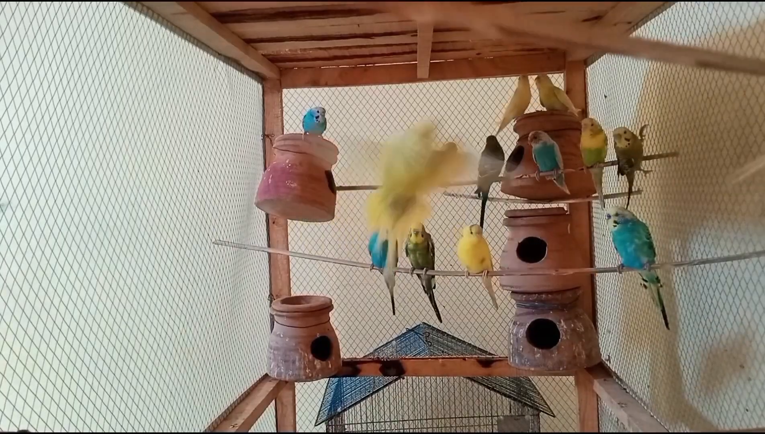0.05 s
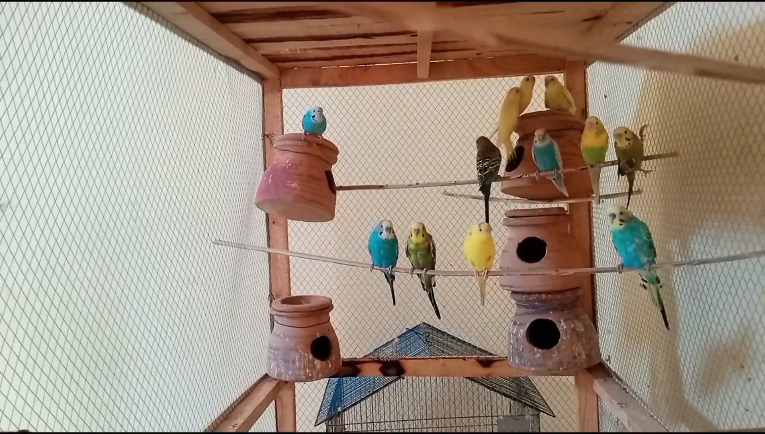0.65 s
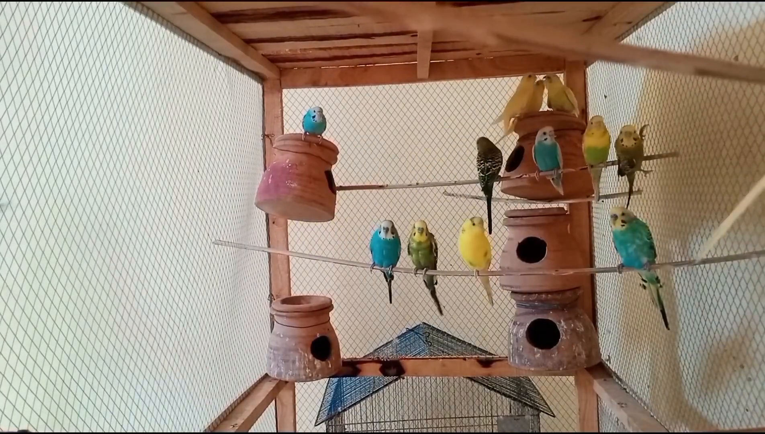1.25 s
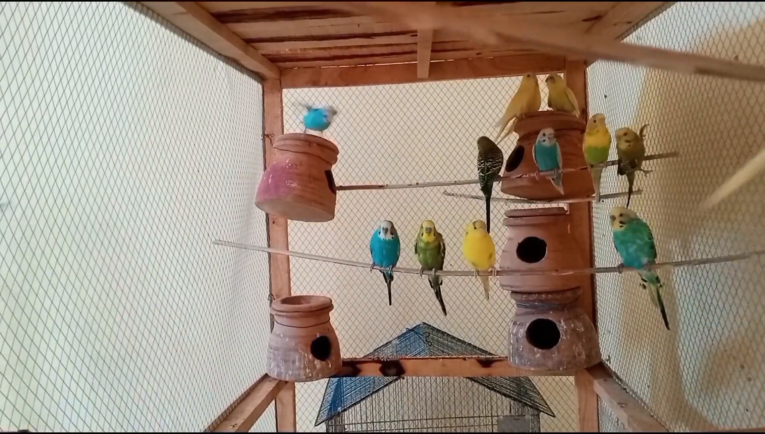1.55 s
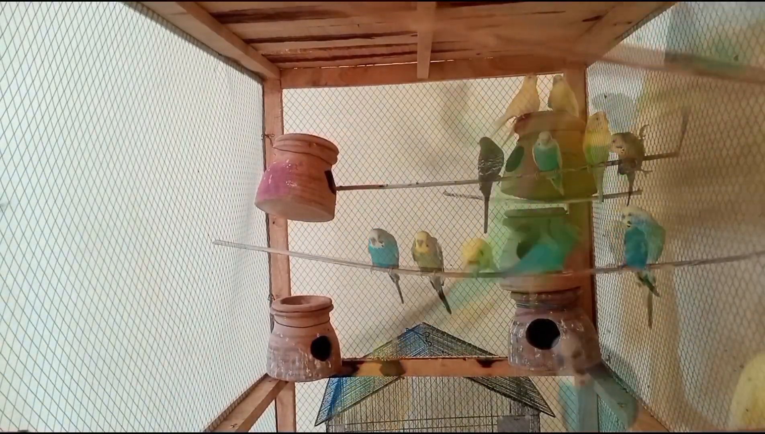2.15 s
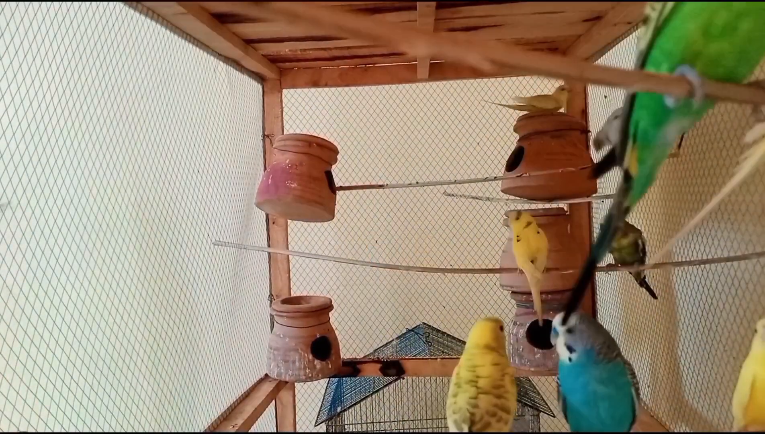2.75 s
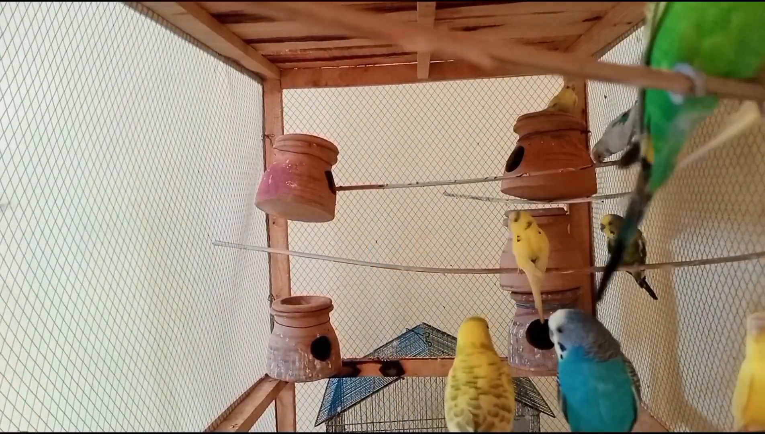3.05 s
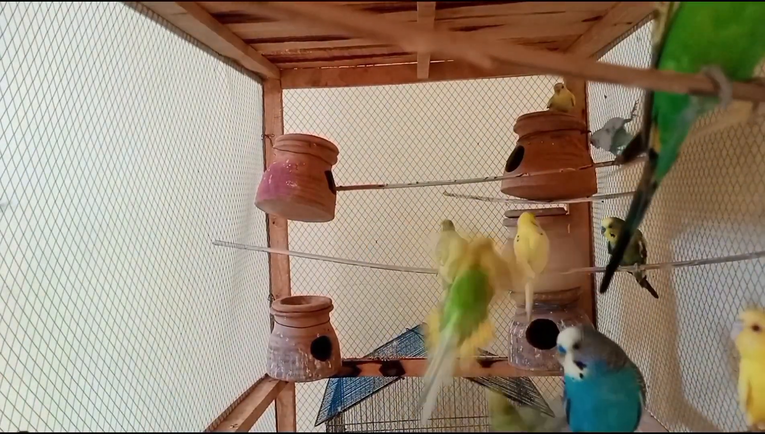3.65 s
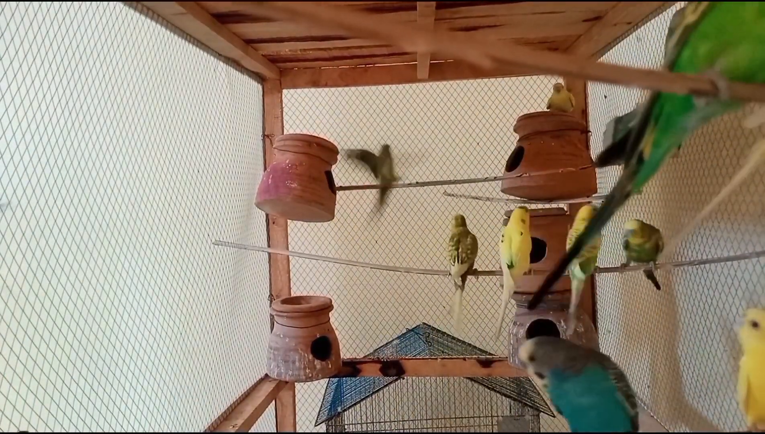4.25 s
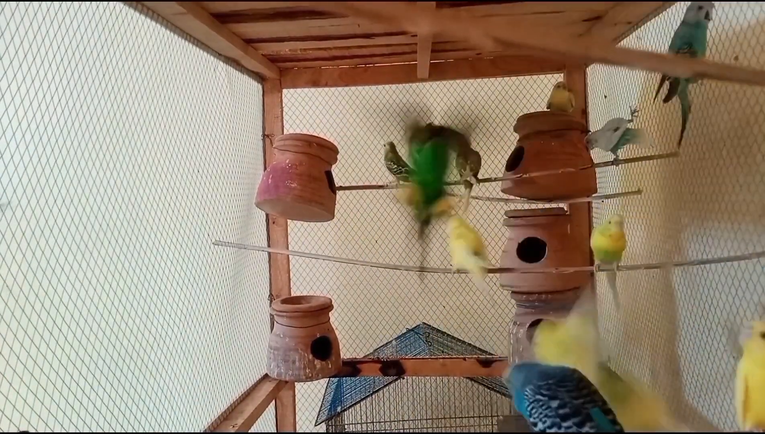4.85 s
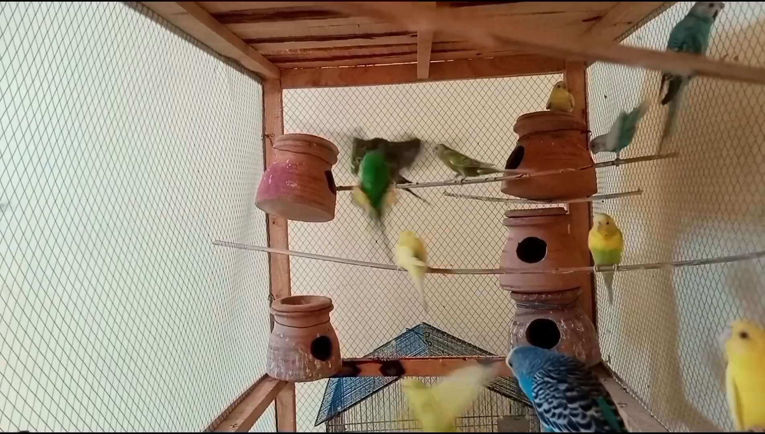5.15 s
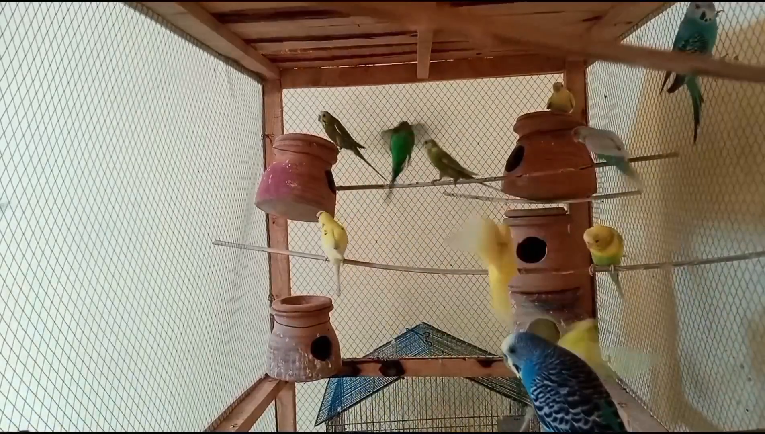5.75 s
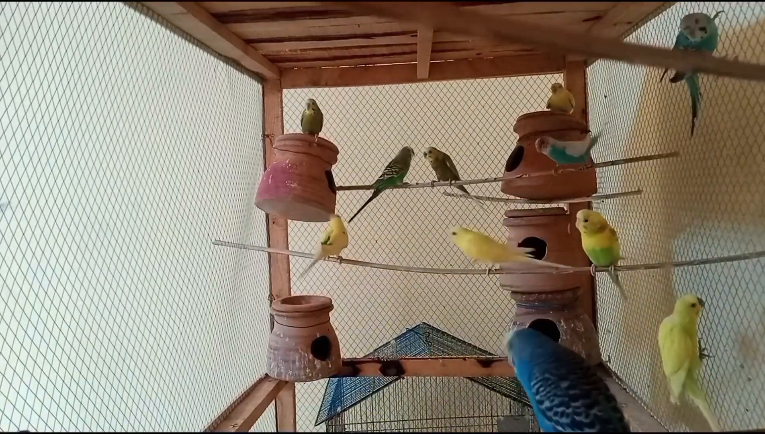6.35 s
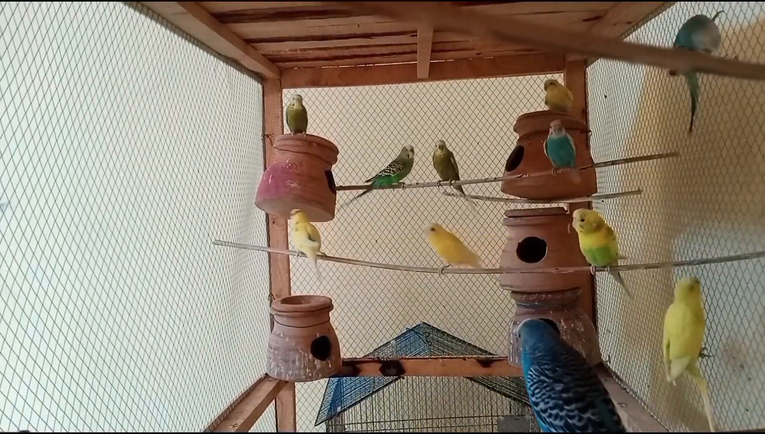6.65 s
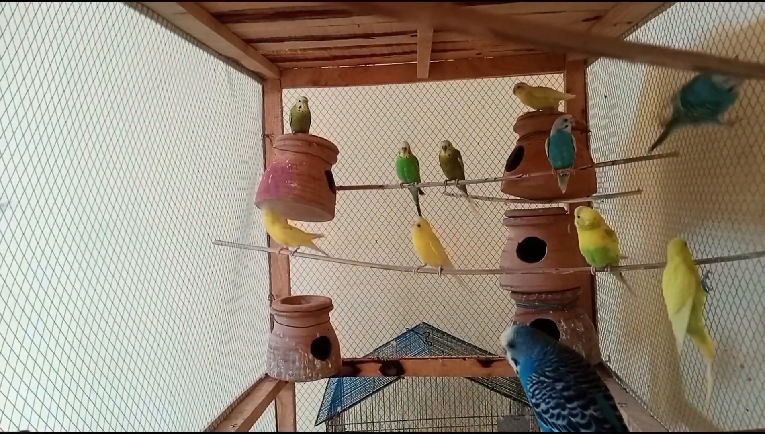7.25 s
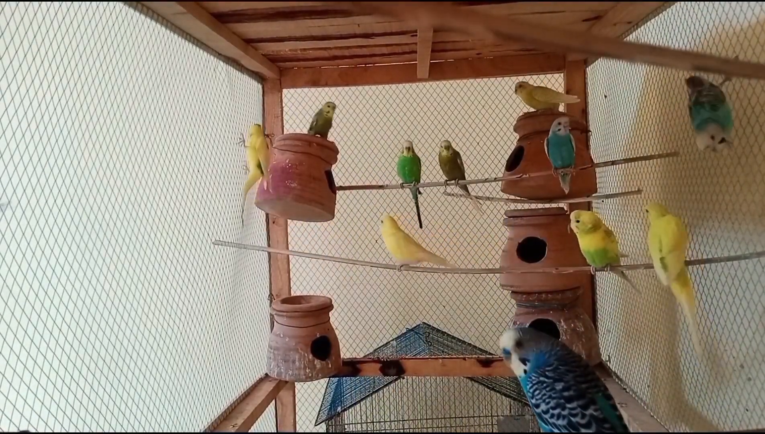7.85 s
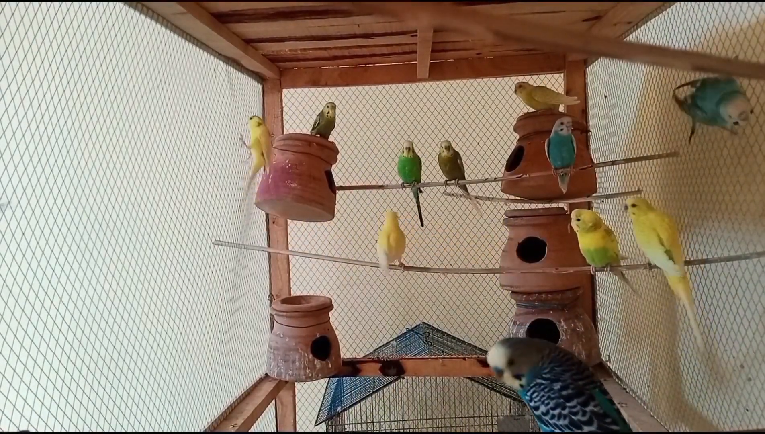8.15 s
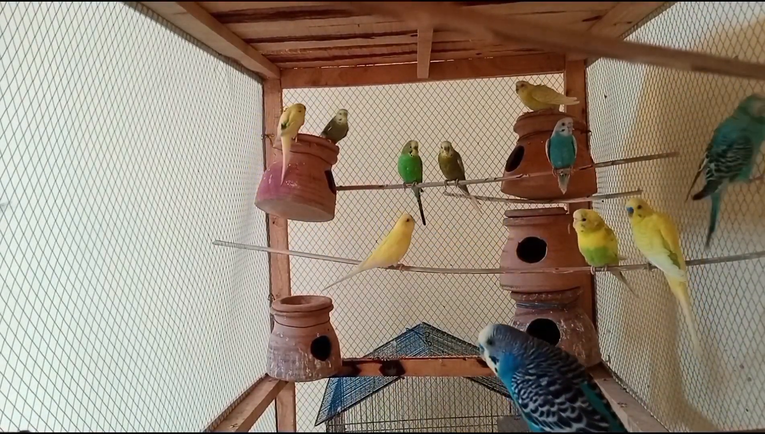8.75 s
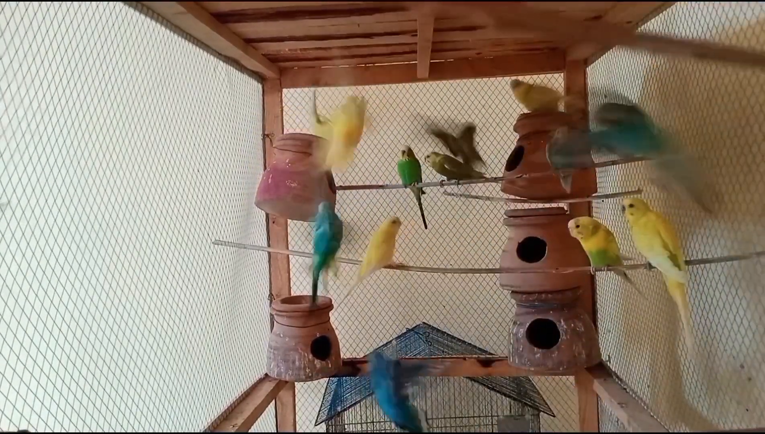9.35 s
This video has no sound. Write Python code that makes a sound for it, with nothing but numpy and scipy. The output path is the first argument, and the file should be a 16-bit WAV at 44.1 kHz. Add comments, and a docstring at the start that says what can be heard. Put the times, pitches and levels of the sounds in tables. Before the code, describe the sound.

Small parrots flutter close by in a wire aviary, with bursts of wingbeats, knocks on perches, brief high chirps and one squawk.

```python
"""A soft rush of wings and a quiet warble: budgerigars in a small wire aviary, in a bare, echoing corner. Then
they fly close by. Their wings push air, thrum and whoosh, feathers swish and snap, claws rattle the mesh, and
wings and feet knock sharply. Between flights the membranes of the syrinx give sharp chirps, one nasal call and
one falling squawk. Near walls echo it all, over a faint outdoor wash."""
import sys
import numpy as np
from scipy import signal
from scipy.fft import rfft, irfft, next_fast_len
from scipy.io import wavfile
from scipy.ndimage import uniform_filter1d

SR = 44100
rng = np.random.default_rng(int(sys.argv[2]) if len(sys.argv) > 2 else 0)


def log_audio(samples):
    """Write samples as a 16-bit WAV file to the path given in sys.argv[1]."""
    # one column per channel
    frames = np.atleast_2d(samples).T
    # limit to full scale, then quantise
    limited = np.clip(frames, -1, 1)
    pcm = np.round(limited * 32767).astype(np.int16)
    wavfile.write(sys.argv[1], SR, pcm)


N = 418950
TOP_HZ = 15750  # upper band edge


# Birds flying past. Each row: closest moment in seconds, push, thrum and whoosh levels in dB,
# approach and departure in seconds. Levels in all cue tables are before the mix gains in scene().
FLYBYS = [(0.03, -56.5, -69, -62.5, 0.54, 0.79), (2.28, -43.5, -53.5, -51, 0.43, 0.226),
          (2.438, -80, -62, -47, 0.11, 0.44), (3.812, -45, -45, -45, 0.25, 0.23),
          (4.03, -77, -56, -61, 0.032, 0.34), (4.18, -64, -76, -52.5, 0.073, 0.22),
          (4.89, -45, -42.5, -45, 0.31, 0.49), (5.18, -40, -42, -39, 0.43, 0.41),
          (5.52, -51, -47.5, -53, 0.61, 0.25), (5.849, -60.5, -61, -59, 0.69, 0.26),
          (9.072, -54, -53, -45, 0.052, 0.63), (9.4, -48, -48.5, -49.5, 0.34, 1)]

def flyby_swell(layer, far_db, roundness=1.44):
    """Each bird swells as it nears and fades as it leaves, passing far_db at both ends of its flight."""
    t, power = np.arange(N) / SR, np.zeros(N)
    for closest, push_db, thrum_db, whoosh_db, approach, departure in FLYBYS:
        db = {"push": push_db, "thrum": thrum_db, "whoosh": whoosh_db}[layer]
        away = np.maximum((closest - t) / approach, (t - closest) / departure)
        power += amp(db + far_db * np.minimum(away, 5) ** roundness) ** 2
    return np.sqrt(power)


# Single flaps whose draught reaches the listener. Each row: middle in seconds, level in dB.
LONE_FLAPS = [(0.532, -62.5), (1.108, -56), (3.42, -53), (4.669, -48.5)]

def flap_swell(width_s=0.044):
    """A lone flap gives one soft swell of air."""
    t = np.arange(N) / SR
    return sum(amp(db) * np.exp(-((t - s) / width_s) ** 2) for s, db in LONE_FLAPS)


# Three layers of moving air: deep push, low thrum, broad whoosh. Each row: frequency in Hz, gain in dB.
PUSH_EQ = [(18, -51.5), (32, -30.5), (50, -9), (72, 7), (100, -13.5), (125, -12), (170, -50), (400, -73.5)]
THRUM_EQ = [(60, -26), (105, -0.5), (130, -1), (180, -0.5), (235, 0.5), (285, -4), (350, -19), (1200, -73)]
WHOOSH_EQ = [(150, -25.5), (340, -4.5), (460, 0), (700, 0), (1300, -1.5), (2200, -11.5), (3000, -14.5),
             (6200, -17.5), (8000, -29), (10000, -30), (13000, -51), (15200, -24.5)]

def wing_air(swell, eq, beat_depth, patch_db, patch_hz, beat_hz=19):
    """Air stirred by the wings, throbbing with their uneven beat."""
    beats = np.sin(phase_of(beat_hz * (1 + 0.191 * wander(N, 7.1))))
    air = resonances(colour(rng.standard_normal(N), eq), patch_db, patch_hz, hold_s=.05)
    air /= np.sqrt(abs(uniform_filter1d(air ** 2, size=4000)) + 1e-12)  # only the birds set the swell
    return unit(air * (1 + beat_depth * beats)) * swell


# The strongest, closest downstrokes. Each row: middle in seconds, level in dB, pitch in Hz.
DOWNSTROKES = [(2.263, -35, 108), (2.311, -38, 128.9), (2.42, -42.5, 259.2), (3.733, -36, 218),
               (3.808, -43, 199), (4.873, -28, 106), (4.917, -27, 130), (4.977, -29.5, 126),
               (5.154, -24, 156), (5.238, -24, 150), (5.338, -27.5, 176), (9.310, -32, 214),
               (9.413, -33, 168), (9.465, -26, 121)]
# The tone of a wing slapping the air. Each row: frequency in Hz, gain in dB.
SLAP_EQ = [(150, 2), (420, -4.5), (800, 9.5), (2200, -32), (9000, -37)]

def wing_thumps(length_s=0.03983, sag_octaves=0.65, slap_db=-7, slap_s=.022):
    """A downstroke slaps the air and shoves a slug of it away: a low thump that sags in pitch."""
    out, n = np.zeros(N), int(slap_s * SR)
    sweep = np.linspace(-.5, .5, int(length_s * SR))
    for s, db, hz in DOWNSTROKES:
        phase = phase_of(hz * 2 ** (-sag_octaves * sweep)) + 2 * np.pi * rng.random()
        add(out, s - length_s / 2, amp(db) * np.sin(phase) * stroke(len(sweep), skew=0.73))
        slap = colour(rng.standard_normal(n), SLAP_EQ) * stroke(n, skew=0.21)
        add(out, s - slap_s / 2, amp(db + slap_db) * slap)
    return out


# Wings whirring as a bird brakes or hovers.
# Each row: start in seconds, length in seconds, pitch in Hz, level in dB.
WHIRRS = [(5.1, 0.45, 205, -45.5), (5.53, 0.17, 126, -42), (5, 0.7, 210, -60)]

def wing_hums(waver=0.031, flutter_db=3):
    """Fast wings set the air humming; the note wavers and flutters."""
    out = np.zeros(N)
    for s, length, hz, db in WHIRRS:
        n = int(length * SR)
        note = np.sin(phase_of(hz * (1 + waver * wander(n, 19.6))))
        add(out, s, amp(db + flutter_db * wander(n, 38)) * note * signal.windows.tukey(n, .5))
    return out


# Quick flicks of wing or tail.
# Each row: start in seconds, level in dB, length in seconds, low rustle in dB, top fizz in dB.
FEATHER_FLICKS = [(1.98, -50.5, 0.1, 11, 3), (2.309, -52.5, 0.0157, 2, 3), (2.367, -45.5, 0.11, 1, 9),
                  (2.403, -38, 0.044, 6, -6), (2.624, -53, 0.019, 20, 8), (2.723, -44.5, 0.033, 6.5, -1),
                  (2.845, -40.5, 0.073, -1, 7.5), (3.547, -51, 0.045, -2.5, 1),
                  (3.769, -41.5, 0.05, -42, -6), (4.828, -47.5, 0.032, -1, 2), (5.097, -43, 0.1, 5, -3),
                  (5.483, -48, 0.0594, -44, 7.5), (5.955, -58, 0.043, -2, -1), (5.994, -35, 0.085, -10, -2),
                  (6.435, -53, 0.018, -19.5, -5), (6.594, -55.5, 0.047, -5, -6.5),
                  (6.829, -59, 0.063, 5, 5.5), (7.062, -42, 0.034, -26.5, -9),
                  (7.136, -49.5, 0.13, -21, -8.5), (7.522, -36.5, 0.085, -16.5, 1.5),
                  (7.565, -42, 0.13, -2, -5), (7.748, -51.5, 0.055, -2, -0.5), (7.847, -45, 0.099, -27, 6),
                  (8.252, -59.5, 0.057, 18, 20), (8.517, -39, 0.068, -13, -17), (8.602, -39.5, 0.11, -7, 1),
                  (8.663, -43, 0.12, 1, -10.5), (9.004, -35, 0.11, 7, -4), (9.137, -51, 0.062, -16, -2),
                  (9.2, -49, 0.044, -2, 8)]
# Longer spells of ruffling and clambering.
# Each row: start in seconds, length in seconds, level in dB, low rustle in dB, top fizz in dB.
RUFFLES = [(0, 0.059, -65.5, 19, -29), (0.315, 0.32, -70.5, 13.5, -6), (1.036, 0.08, -69, 17, 4),
           (2.539, 0.26, -49.5, 2.5, -8.5), (3.285, 0.16, -60.5, 1.5, -5), (3.581, 0.15, -55.5, 8, -2),
           (4.62, 0.074, -45, 8, -3.5), (5.017, 0.196, -54.5, 9, -12), (5.406, 0.12, -46, -4, -9),
           (6.938, 0.32, -52.5, 3.5, -12), (7.884, 0.13, -55.5, 7.5, -35), (8.167, 0.14, -51, 4, -25),
           (8.347, 0.0767, -60.5, 6, 3), (9.118, 0.14, -50.5, 1, -8), (9.43, 0.057, -54, 13, -14)]
# The bright tone of feathers rubbing. Each row: frequency in Hz, gain in dB.
FEATHER_EQ = [(300, -28.5), (800, -17.5), (1300, -20), (1700, -9.5), (2000, -15.5), (2450, -6),
              (2900, -10.5), (4300, -2.5), (6200, 3), (7200, -5.5), (8100, -12.5), (9200, -5.5),
              (12000, -17), (15200, -9.5)]

def feathers(grain_db=0.5):
    """Barbs slide over each other and the wire: a bright, grainy hiss under each flick and ruffle."""
    out = np.zeros(N)
    hiss = resonances(rng.standard_normal(N), depth_db=4.5, width_hz=260, hold_s=.07)
    barbs = hiss * amp(grain_db * wander(N, 700))
    moves = [(s, amp(db) * stroke(int(length * SR), skew=0.42), shelves)
             for s, db, length, *shelves in FEATHER_FLICKS]
    moves += [(s, amp(db) * ruffle(length), shelves) for s, length, db, *shelves in RUFFLES]
    for s, force, shelves in moves:
        slide = barbs.take(int(s * SR) + np.arange(len(force)), mode="wrap")
        slide /= np.std(colour(slide, FEATHER_EQ))
        add(out, s, colour(slide, FEATHER_EQ, *shelves) * force)
    return out


def ruffle(length, attack_s=0.0053, release_s=0.013, fade_db=-4, shuffle_db=3.5, shuffles_per_s=41.5):
    """The envelope of small uneven movements that start quickly and slacken."""
    t = np.arange(int(length * SR)) / SR
    edges = np.clip(np.minimum(t / attack_s, (length - t) / release_s), 0, 1)
    return edges * amp(fade_db * (t / length - 0.5) + shuffle_db * wander(len(t), shuffles_per_s))


def wing_snaps(swell, beat_hz=17, unevenness=0.5, snap_s=0.016, snap_db=-10.5, spread_db=3):
    """Flight feathers snap in an uneven wingbeat rhythm, as loud as the bird is near."""
    gaps, sizes = rng.standard_normal((400, 2)).T
    times = np.cumsum(np.exp(unevenness * gaps)) / beat_hz
    force = np.zeros(N)
    for s, size in zip(times, np.clip(sizes, -2, 2)):
        add(force, s, amp(snap_db + spread_db * size) * stroke(int(snap_s * SR), skew=.4))
    return colour(rng.standard_normal(N), FEATHER_EQ, low_db=7.5, high_db=3.5) * force * swell


def quills(swell, per_s=40, spread_db=5, tick_db=-19, rest_db=-72):
    """Stiff quills and claws tick at random, harder while birds are flying."""
    sizes = amp(spread_db * np.minimum(rng.exponential(1, N), 3))
    hits = sizes * (rng.random(N) < per_s / SR)
    tick = rng.standard_normal(200) * np.exp(-np.linspace(0, 5, 200))
    ticks = colour(signal.oaconvolve(hits, tick)[:N], FEATHER_EQ, high_db=-7.0)
    return amp(tick_db) * unit(ticks) * (swell + amp(rest_db))


# Dry knocks, from wings clapping in flight and feet landing. Each row: start in seconds, level in dB, low thud
# in dB, top snap in dB.
CRACKS = [(2.197, -23.5, 0.5, -8.5), (2.395, -16, -5, 0.5), (2.721, -25, -20, -9), (2.848, -23, -19, 6),
          (4.76, -19, 2.5, 0.5), (4.879, -17, 8, -0.5), (4.941, -24.5, 7, -3), (5.007, -18, -12, 0),
          (5.059, -20.5, -10, -1), (8.978, -34.5, -7, 5)]
# The body of a dry knock. Each row: frequency in Hz, gain in dB.
CRACK_EQ = [(80, -35.5), (250, 15), (700, -2.5), (1700, 1.5), (3000, -1.5), (5500, 2), (8000, -4),
            (10000, -7), (13000, -22.5), (15200, -5.5)]

def dry_cracks(attack_s=0.00074, decay_s=0.0044):
    """Wings clap or feet land: a dry crack that dies in milliseconds."""
    out, t = np.zeros(N), np.arange(2048) / SR
    envelope = np.exp(-t / decay_s) * (1 - np.exp(-t / attack_s))
    for s, db, thud_db, snap_db in CRACKS:
        crack = colour(rng.standard_normal(len(t)), CRACK_EQ, thud_db, snap_db, low_hz=990, high_hz=4870)
        add(out, s, amp(db) * crack * envelope)
    return out


# Claws on the mesh. Each row: start in seconds, length in seconds, level in dB, brightness in dB.
CLAW_GRIPS = [(2.672, 0.081, -52.5, -18), (6.004, 0.077, -53.5, -19), (6.942, 0.085, -53.5, -11),
              (7.058, 0.0148, -59, 5.5), (7.128, 0.013, -50.5, 4), (7.447, 0.03, -57.5, -3),
              (7.75, 0.11, -55.5, -4.5), (7.866, 0.047, -48, 11), (7.93, 0.047, -53, -3),
              (8.191, 0.14, -52, -2), (8.483, 0.07, -54.5, 6), (8.525, 0.02, -45.5, 9.5),
              (8.581, 0.012, -41.5, 26), (8.65, 0.094, -52.5, 0), (8.891, 0.11, -60.5, -2)]
# The ringing modes of the wire. Each row: frequency in Hz, level in dB, seconds to fade by 60 dB.
WIRE_MODES = [(860, -9.5, 0.05), (1378, -10, .035), (1655, -3, 0.07), (1830, -3, 0.025), (2330, -2, 0.04),
              (2510, -3, 0.045), (3700, 1, 0.012), (4400, 4, 0.012), (4950, 5, 0.012), (6250, 4, 0.03)]

def mesh_rattles(catches_per_s=220, grit_db=4.5, place_db=2, detune=0.038, bright_hz=3500):
    """Each claw catches and slips, ringing the wire a little differently at each place it grips."""
    out, t = np.zeros(N), np.arange(SR // 3) / SR
    hz, mode_db, t60 = np.transpose(WIRE_MODES)[:, :, None]
    for s, length, db, bright_db in CLAW_GRIPS:
        strength, tuning = rng.standard_normal((2, len(WIRE_MODES), 1))
        gain_db = mode_db + place_db * strength + bright_db * (hz > bright_hz)
        modes = np.sin(2 * np.pi * hz * (1 + detune * tuning) * t)
        ring = (amp(gain_db - 60 * t / t60) * modes).sum(0)
        n = int(length * SR)
        slips = rng.standard_normal(n) * amp(grit_db * wander(n, catches_per_s)) * stroke(n, skew=0.43)
        rattle = signal.fftconvolve(slips, ring)
        add(out, s, amp(db) * rattle / np.std(rattle[:n + 500]))
    return signal.sosfilt(signal.butter(2, 750, "highpass", fs=SR, output="sos"), out)


# The colour the beak gives to overtones. Each row: frequency in Hz, gain in dB.
BEAK_EQ = [(2800, 10.5), (4200, 1), (5600, 9), (7100, 7.5), (7900, -12), (8900, -1.5), (10500, -30),
           (12500, -42)]

def syrinx(hz, tone_db, overtone_db, rough, jitter=0.16, shimmer=0.1):
    """A whistling membrane; its overtones pass the beak, and roughness shakes pitch and strength."""
    phase = phase_of(hz * (1 + jitter * rough * wander(len(hz), 1100)))
    overtones = sum(amp(curve_at(BEAK_EQ, k * hz)) * (k * hz < TOP_HZ) * np.sin(k * phase)
                    for k in range(2, 8))
    voice = amp(tone_db) * np.sin(phase) + amp(overtone_db) * overtones
    return np.sqrt(2) * voice * (1 + shimmer * rough * wander(len(hz), 1800))


# The squawk's two falling sweeps, the nasal call and a quick upward chirp.
# Each row: time in seconds, pitch in Hz, level in dB.
SQUAWK_FIRST = [(6.240, 3810, -51.5), (6.246, 3740, -32), (6.257, 3704, -40.5), (6.261, 3180, -36),
                (6.270, 3490, -18.5), (6.276, 3508, -48), (6.280, 2836, -28), (6.289, 2033, -20.5),
                (6.297, 2140, -40), (6.307, 2470, -18), (6.314, 2433, -46), (6.321, 2380, -15.5),
                (6.327, 1950, -24.5), (6.334, 1800, -32)]
SQUAWK_SECOND = [(6.320, 4070, -32.5), (6.329, 3780, -26), (6.335, 3490, -19.5), (6.341, 2870, -15.5),
                 (6.346, 3025, -18), (6.358, 2490, -19), (6.368, 2360, -36)]
NASAL_CALL = [(3.370, 1246, -60), (3.381, 1740, -47.5), (3.392, 1451, -45.5), (3.425, 1440, -40),
              (3.452, 1350, -40), (3.47, 1302, -67)]
UPWARD_CHIRP = [(4.2595, 2330, -50), (4.261, 2528, -29), (4.264, 2793, -38), (4.269, 2880, -37),
                (4.279, 2720, -45)]

def call(contour, rough, overtone_db, brightening=0):
    """One note that follows its pitch and effort; with brightening, a harder push favours overtones."""
    s, hz, db = np.transpose(contour)
    t, out = np.arange(s[0], s[-1], 1 / SR), np.zeros(N)
    effort_db = np.interp(t, s, db)
    upper_db = effort_db + overtone_db + brightening * (effort_db - db.max())
    note = syrinx(np.interp(t, s, hz), effort_db, upper_db, rough)
    add(out, s[0], note * signal.windows.tukey(len(t), .05))
    return out


# Sharp pips and murmured notes, and at 3.742 s the tonal hit of a wing at takeoff. Each row: middle in seconds,
# length in seconds, pitch in Hz, glide in # octaves, fundamental in dB, overtones in dB, roughness from 0 to 1,
# echo send in dB.
PIPS = [(0.248, 0.19, 689, -0.13, -65, -106, 0.6, 1.5), (0.755, 0.029, 1800, 0.55, -57, -73.5, 0.56, 3.5),
        (0.752, 0.014, 5570, 0.053, -48.5, -85, 0.1, -5), (1.508, 0.028, 884, -0.46, -62.5, -85, 0.15, 1),
        (1.616, 0.02, 1365, 0.028, -58, -87.5, 0.23, -1), (1.683, 0.035, 873, 0.12, -67, -92, 0.2, 4.5),
        (1.9914, 0.013, 2833, -0.12, -18.5, -55, 0.2, -6.5),
        (1.996, 0.014, 2835, -0.91, -32.5, -58, 0.42, 12),
        (3.742, 0.011, 1167, -0.35, -36.5, -74.5, 0.42, -10),
        (4.15, 0.013, 2480, 0.65, -44, -46.5, 0.77, 9.5), (4.159, 0.0095, 3220, 0.2, -24.5, -34.5, 0.3, -4),
        (4.331, 0.012, 3030, 0.17, -28, -40.5, 0.17, -4.5), (4.419, 0.01, 3036, 0.15, -29, -44, 0.23, 0.5),
        (4.557, 0.012, 3186, -0.03, -33.5, -45.5, 0.22, 5),
        (6.082, 0.037, 5060, 0.054, -44.5, -85, 0.3, -11),
        (6.446, 0.02, 5630, -0.23, -48.5, -76, 0.31, 5.5), (7.068, 0.013, 6300, -0.028, -35, -60, 0, -16.5),
        (7.208, 0.014, 6100, -0.13, -34, -62, 0.2, -9.5),
        (7.42, 0.017, 6080, -0.013, -34, -56, 0.15, -11.5),
        (8.517, 0.06, 2500, 0.0044, -47.5, -80.5, 0.48, 2)]

def chirps():
    """Brief pips, heard directly and by way of the walls, more so when the bird faces away."""
    direct, send = np.zeros((2, N))
    for s, length, hz, glide, tone_db, overtone_db, rough, echo_db in PIPS:
        sweep = np.linspace(-.5, .5, int(length * SR))
        pip = syrinx(hz * 2 ** (glide * sweep), tone_db, overtone_db, rough)
        pip *= signal.windows.tukey(len(sweep), .8)
        add(direct, s - length / 2, pip)
        add(send, s - length / 2, amp(echo_db) * pip)
    return direct, send


# Soft two-voiced notes. Each row: start in seconds, buzz level in dB, length in seconds,
# buzz rate in Hz, whistle pitch in Hz, whistle level in dB.
WARBLE_NOTES = [(0.693, -69, 0.029, 333, 2300, -55), (0.798, -61, 0.024, 311, 2500, -51.5),
                (0.864, -57.5, 0.024, 347, 2450, -51), (0.925, -54, 0.021, 315, 2550, -44.5),
                (1.013, -58, 0.027, 332, 2560, -49), (1.082, -60, 0.032, 288, 2403, -64),
                (1.138, -60, 0.022, 330, 2517, -63), (1.198, -57, 0.028, 386, 2324, -55),
                (1.268, -55, 0.046, 370, 2500, -52), (1.341, -60, 0.0285, 485, 2896, -56),
                (1.484, -59, 0.02, 455, 2533, -49.5), (1.585, -61.5, 0.0317, 444, 2574, -57),
                (1.656, -74, 0.025, 454, 2614, -61)]
# The buzz broadens through the phrase. Each row: time in seconds, low shelf in dB, high shelf in dB.
WARBLE_SHELVES = [(.7, -19, -5), (.92, -4, 8), (1.251, 1, 11.5), (1.6, 18, 18.5)]
# The colour the throat gives to the buzz. Each row: frequency in Hz, gain in dB.
THROAT_EQ = [(400, -70), (850, -16), (1300, -4.5), (1800, -7.5), (2450, 1), (3000, 1.5), (3800, -12.5),
             (5600, -16), (7500, -29), (9000, -22), (12000, -56)]

def warble(waver=0.06, rise_octaves=0.22, wobble=0.065, husk=0.25):
    """One side of the syrinx gives a soft, husky buzz; it shakes the rising whistle of the other side."""
    out, harmonics = np.zeros(N), np.arange(1, 30)
    when, *shelves = np.transpose(WARBLE_SHELVES)
    for s, db, length, buzz_hz, whistle_hz, whistle_db in WARBLE_NOTES:
        n = int(length * SR)
        low_db, high_db = (np.interp(s, when, shelf) for shelf in shelves)
        phase = phase_of(buzz_hz * (1 + waver * wander(n, 147)))
        partials = np.cos(np.outer(phase, harmonics) + 2 * np.pi * rng.random(len(harmonics)))
        drive = unit(partials.sum(1)) + husk * rng.standard_normal(n)
        buzz = amp(db) * colour(unit(drive), THROAT_EQ, low_db, high_db, low_hz=1554, high_hz=4060)
        pitch = whistle_hz * 2 ** (rise_octaves * np.linspace(-.5, .5, n)) * (1 + wobble * np.sin(phase))
        whistle = syrinx(pitch, whistle_db, whistle_db - 27, rough=.2)
        add(out, s, (buzz + whistle) * signal.windows.hann(n) ** 0.5)
    # beak and throat change shape from note to note
    return resonances(out, depth_db=4, width_hz=380, hold_s=.07)


# How long the bare corner rings. Each row: frequency in Hz, seconds to fade by 60 dB.
CORNER_DECAY = [(100, 0.61), (1000, 0.55), (2600, 0.4), (2950, 0.56), (3350, 0.47), (6000, 0.33),
                (10000, 0.16), (15000, 0.16)]

def corner_echo(early_boost=0.96, early_s=0.003, predelay_s=.0025):
    """Dense echoes off near walls, then a tail in which each band dies at its own speed."""
    taps = rng.standard_normal(SR) * (rng.random(SR) < .15)
    hz, t, bands = signal.stft(taps, SR, nperseg=256)
    decay = amp(-60 * t / curve_at(CORNER_DECAY, hz)[:, None])
    tail = signal.istft(bands * decay, SR, nperseg=256)[1][:SR]
    spectrum = rfft(tail * (1 + early_boost * np.exp(-np.arange(SR) / SR / early_s)))
    # the walls return all pitches about equally
    spectrum /= np.sqrt(uniform_filter1d(abs(spectrum) ** 2, size=250))
    return np.concatenate([np.zeros(int(predelay_s * SR)), irfft(spectrum)[:SR * 3 // 4]])


# The tone of the outdoor bed. Each row: frequency in Hz, gain in dB.
OUTDOOR_EQ = [(20, -27.5), (45, -15), (75, 4.5), (170, 5), (350, 2.5), (700, -1.5), (1500, -5), (3000, -10),
              (4800, -7), (6200, -4.5), (8000, -8.5), (12500, -19.5), (15200, -12.5)]
# Its slow rise and fall. Each row: time in seconds, level in dB.
OUTDOOR_LEVEL = [(0, -71.5), (1.5, -71.5), (3.1, -67), (5.8, -60.5), (6.8, -67), (9.5, -62.5)]

def outdoor_wash():
    """A faint outdoor wash whose level drifts gently."""
    level_db = np.interp(np.arange(N) / SR, *np.transpose(OUTDOOR_LEVEL)) + wander(N, 1.4)
    return amp(level_db) * colour(rng.standard_normal(N), OUTDOOR_EQ)


def amp(db):
    """Decibels as a gain."""
    return 10 ** (np.asarray(db) / 20)


def unit(x):
    """Scales x to unit power."""
    return x / np.sqrt(np.mean(x ** 2) + 1e-20)


def phase_of(hz):
    """The running phase of a changing pitch, in radians."""
    return 2 * np.pi * np.cumsum(hz) / SR


def curve_at(points, hz):
    """Reads a curve along a logarithmic frequency axis."""
    point_hz, value = np.transpose(points)
    return np.interp(np.log(hz + 1), np.log(point_hz + 1), value)


def add(mix, s, sound):
    """Lays a sound into the mix at s seconds."""
    part = mix[max(round(s * SR), 0):][:len(sound)]
    part += sound[:len(part)]


def colour(x, eq, low_db=0, high_db=0, low_hz=3000, high_hz=8000):
    """Filters x by an EQ curve of unit power, with a shelf at each end."""
    size = next_fast_len(len(x))
    hz = np.fft.rfftfreq(size, 1 / SR)
    shelves = low_db / (1 + (hz / low_hz) ** 8) + high_db * (1 - 1 / (1 + (hz / high_hz) ** 8))
    return irfft(rfft(x, size) * unit(amp(curve_at(eq, hz))) * amp(shelves), size)[:len(x)]


def wander(count, rate_hz):
    """A random drift that turns about rate_hz times a second."""
    at = np.arange(count) * rate_hz / SR
    points = int(at[-1]) + 2
    return np.interp(at, np.arange(points), rng.standard_normal(points))


def stroke(count, skew):
    """A quick swell and a slower fade; less skew sharpens the attack."""
    return np.sin(np.pi * np.linspace(0, 1, count) ** skew) ** 2


def resonances(x, depth_db, width_hz, hold_s):
    """Patches of pitch that swell and fade as feathers, wire or throat change shape."""
    hz, t, bands = signal.stft(x, SR, nperseg=1024)
    patches = rng.standard_normal((400, 400))
    # stretch the random grid smoothly, first over pitch, then over time
    for at in (hz / width_hz, t / hold_s):
        cell, share = at.astype(int), (at % 1)[:, None]
        below, above = patches[cell % len(patches)], patches[(cell + 1) % len(patches)]
        patches = ((1 - share) * below + share * above).T
    gain = unit(amp(depth_db * unit(np.tanh(patches))))
    return signal.istft(bands * gain, SR, nperseg=1024)[1][:len(x)]


def scene():
    """The birds reach the listener directly and by way of the walls, over the outdoor wash."""
    pips, pip_send = chirps()
    push = flyby_swell("push", far_db=-36.0) + flap_swell()  # the draught is felt only close by
    thrum, whoosh = flyby_swell("thrum", far_db=-24.0), flyby_swell("whoosh", far_db=-26.5)
    squawk = call(SQUAWK_FIRST, rough=.16, overtone_db=-28.5)
    squawk += call(SQUAWK_SECOND, rough=.16, overtone_db=-32.5)
    # Each row: sound, direct gain in dB, echo send in dB.
    layers = [(squawk, -7.0, -5.5),
              (call(NASAL_CALL, rough=.16, overtone_db=-17.0, brightening=1.0), 1.5, -3.0),
              (call(UPWARD_CHIRP, rough=.14, overtone_db=6.0), -5.5, -0.5),
              (warble(), -2, -4.5),
              (wing_thumps(), -9.5, -13.5),
              (wing_hums(), 3.5, -10),
              (feathers(), 4.0, -4.0),
              (mesh_rattles(), -4.5, -1.5),
              (quills(thrum), 6.0, 9.5),
              (wing_snaps(whoosh), 2.5, -16.5),
              (dry_cracks(), -6.5, -4.5),
              (wing_air(push, PUSH_EQ, beat_depth=0.71, patch_db=1.0, patch_hz=50), -0.5, -19.0),
              (wing_air(thrum, THRUM_EQ, beat_depth=0.067, patch_db=4, patch_hz=58.4), -2.0, -3.5),
              (wing_air(whoosh, WHOOSH_EQ, beat_depth=0.17, patch_db=6.5, patch_hz=88.8), 1.5, -10.0)]
    direct = amp(-3.5) * pips + sum(amp(db) * sound for sound, db, _ in layers)
    send = amp(1.0) * pip_send + sum(amp(db) * sound for sound, _, db in layers)
    echo = signal.oaconvolve(send, corner_echo())[:N]
    return (direct + echo + outdoor_wash())[None]


def record(dry, low_cut_hz=52):
    """Trims the deepest bass and the very top of the treble."""
    heard = signal.sosfilt(signal.butter(3, low_cut_hz, "highpass", fs=SR, output="sos"), dry)
    high_cut = signal.firwin(511, TOP_HZ, window=("kaiser", 9), fs=SR)
    return signal.oaconvolve(heard, high_cut[None], "same")


dry = scene()
out = record(dry)
log_audio(out)
```